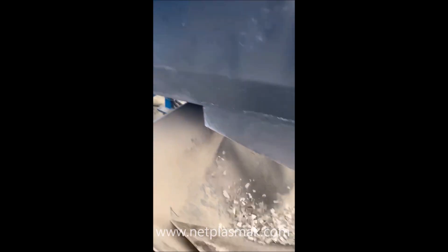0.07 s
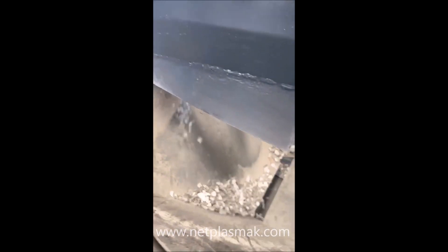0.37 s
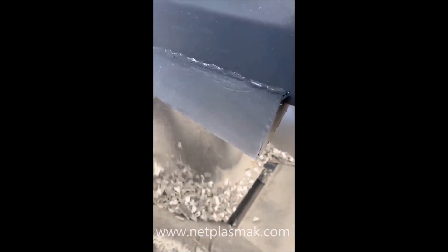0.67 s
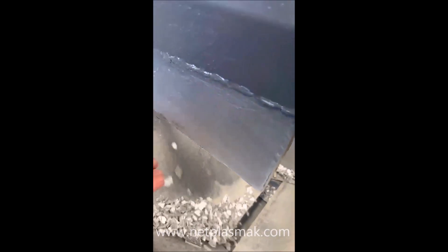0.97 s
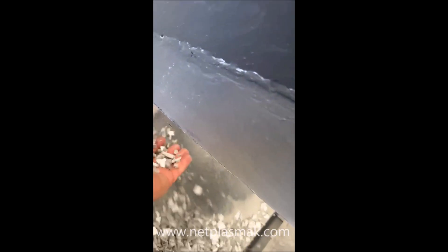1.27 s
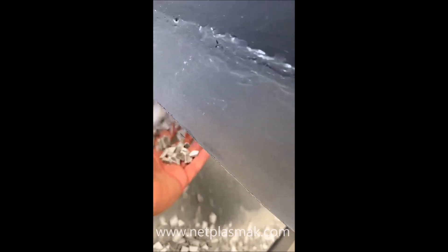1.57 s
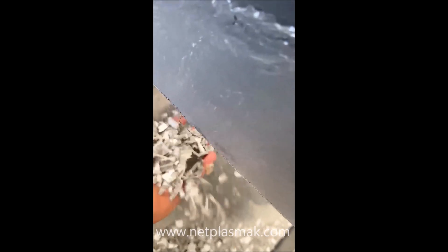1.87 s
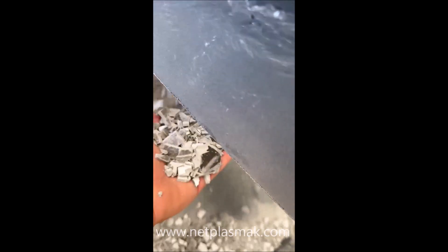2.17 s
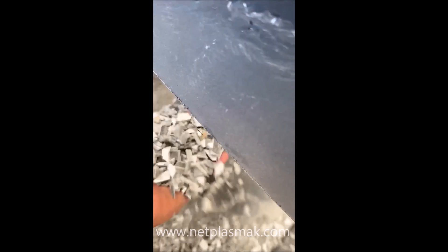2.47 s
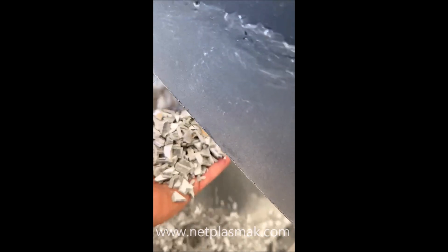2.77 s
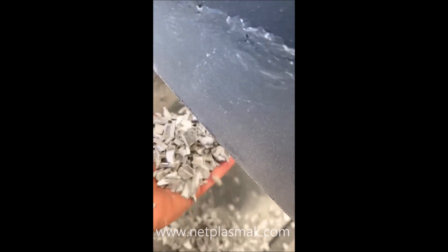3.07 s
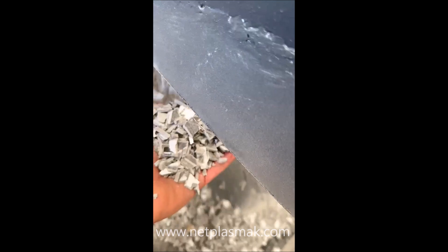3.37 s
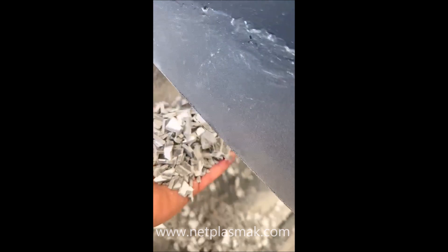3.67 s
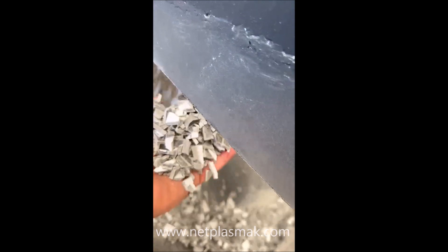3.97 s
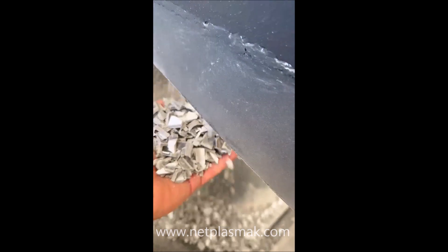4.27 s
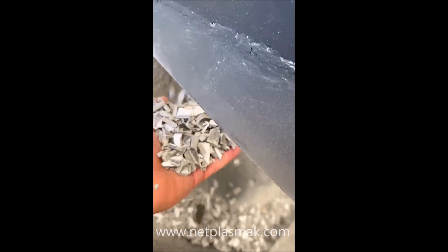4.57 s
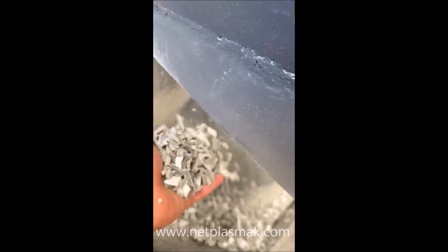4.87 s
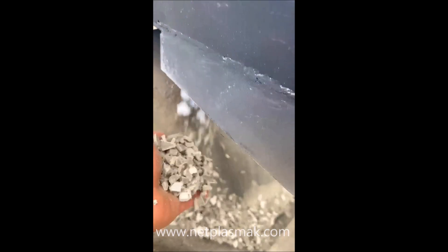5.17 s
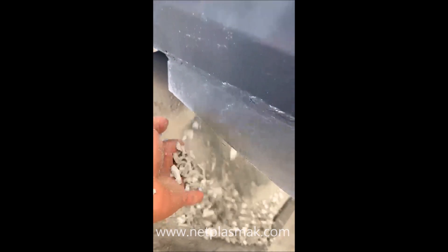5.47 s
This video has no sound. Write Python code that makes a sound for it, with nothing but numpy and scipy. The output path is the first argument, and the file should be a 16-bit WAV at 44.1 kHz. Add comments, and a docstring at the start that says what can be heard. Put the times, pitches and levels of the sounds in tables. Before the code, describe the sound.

A plastic shredder rumbles and grinds, biting into scrap with knocks and thumps while chips hiss and rattle down its chute.

```python
"""A booming rumble under a hiss of chips: a plastic shredder in a workshop, heard beside its chute.
The motor hums, its drive whines, and the rotor tumbles scrap in a steel housing. Chips rattle down
the chute into a hand, and larger lumps knock on the walls and set them ringing. The knives bite
again and again, twice into big pieces, and each fracture excites the resonant modes of the housing."""
import sys
import numpy as np
from scipy import signal
from scipy.fft import rfft, irfft, next_fast_len
from scipy.io import wavfile
from scipy.ndimage import uniform_filter1d, map_coordinates

SR = 44100
rng = np.random.default_rng(int(sys.argv[2]) if len(sys.argv) > 2 else 0)


def materialize(psi):
    """Save the field psi as 16-bit PCM at rate SR to the path in sys.argv[1].

    A 1-D psi becomes a single channel; in a 2-D psi each row is a channel.
    """
    bounded = np.clip(np.atleast_2d(psi).T, -1, 1)
    quanta = np.round(bounded * 32767).astype(np.int16)
    wavfile.write(sys.argv[1], SR, quanta)


N = 251811
TIME = np.arange(N) / SR
FFT_SIZE = next_fast_len(N + SR // 2)
FREQ_HZ = np.fft.rfftfreq(FFT_SIZE, 1 / SR)

# Levels are relative within each source.
# level, phase and likeness of the two channels:
# frequency_hz, left_minus_right_db, left_phase_rad, likeness (0-1)
STEREO_IMAGE = [(55, -1.5, -.2, .88), (100, -8, -.4, .92), (140, -15, -1.4, .75), (240, -14.5, -2.1, .6),
                (300, -10.5, -2.4, .64), (370, -8.5, -3.3, .72), (450, -3.4, -3.3, .83),
                (650, -2.7, -3.4, .83), (870, -.4, -3.2, .94), (1000, -.8, -3.3, .86),
                (1150, -1.5, -3.6, .54), (1400, -1, -3.2, .47), (1700, -1, -3.9, .22),
                (2000, .3, -4.2, .35), (3200, .4, -3.6, .58), (3700, .8, -4.1, .47), (4050, 1.7, -5.2, .2),
                (4400, .1, -3.9, .25), (4700, -.7, -3.2, .75), (4880, -.7, -3.2, .88),
                (5050, -2.2, -4.2, .26), (5250, -1, -6.2, .85), (6500, 0, -6.3, .99), (7200, .2, -6.4, .92),
                (7800, -.6, -7, .73), (8500, -.3, -7.5, .66), (9400, -.4, -6.4, .8)]
# hum of motor and rotor: pitch_hz, level_db
HUM_TONES = [(49.7, -53), (100, -45), (150.7, -44), (177, -51.5), (248, -45), (362, -49.5), (412, -49.5)]
# switching tone of the drive and its sidebands, lowest first: left_db, right_db
WHINE_LINES = [(-60, -50), (-47, -50.5), (-50.5, -51.5), (-50.5, -57), (-56.5, -56.5)]
# tones of the motor shaft: pitch_hz, level_db, left_lag_rad
SHAFT_TONES = [(493, -4, 3.33), (594.6, -1, 2.46), (980, -12, 2.75)]
# rise and fall of the shaft tones: time_s, level_db
SHAFT_LEVEL = [(0, -42.5), (.45, -47.5), (.65, -36.5), (1.5, -36.5), (2.6, -38.5), (3.3, -41), (4.0, -42),
               (4.8, -36), (5.71, -38)]
# fullness of the cutting chamber, as the level of the tumbling scrap: time_s, level_db
CHAMBER_LOAD = [(0, -32.5), (.45, -32.5), (1.1, -31), (1.45, -29), (2.15, -27.5), (2.7, -27), (3.1, -28.5),
                (3.55, -27), (4.25, -27.5), (4.55, -28), (5.71, -28)]
# spectra of frame, scrap, screen, chips and lumps: frequency_hz, density_db
RUMBLE_SPECTRUM = [(20, -70.5), (36, -38), (48, -6), (75, -8), (100, 0.5), (135, 2), (200, -7),
                   (400, -30.5), (1000, -71.5)]
TUMBLE_SPECTRUM = [(70, -26.5), (140, -9), (210, 0), (320, 4), (460, -5), (630, -4.5), (800, -16),
                   (1100, -18.5), (2000, -55.5)]
GRIND_SPECTRUM = [(400, -22), (650, 7.5), (870, 9), (1250, 3.5), (1650, 0.2), (2050, 3), (2450, 0),
                  (2800, -1), (3200, -2.5), (3550, -2), (4100, -14.5), (5000, -24.5), (10000, -42.5)]
CHIP_SPECTRUM = [(1000, -30), (3000, -10.5), (3600, -2), (4100, -3.5), (4700, 0), (5150, -5.5),
                 (6000, -1.5), (7000, -1.5), (7800, 0.5), (8450, -1), (8800, -4), (9300, -12), (9800, -44)]
CLACK_SPECTRUM = [(300, -8), (900, 11.5), (1400, 3.5), (2400, 1), (5000, -10.5), (10000, -29.5)]
# stream of chips, which grows as the hand moves in under the chute: time_s, level_db
CHIP_FLOW = [(0, -38.5), (1.7, -38), (2.0, -36), (3.5, -40.5), (4.0, -38.5), (5.0, -35), (5.71, -36)]
# clumps of fine chips and coarse splinters sliding out: centre_s, fine_db, coarse_db, half_length_s
CLUMPS = [(0.665, -34.5, -34, 0.016), (0.737, -33.5, -37, 0.0065), (0.754, -34.5, -47, 0.0044),
          (1.206, -35.5, -35, 0.04), (1.886, -34.5, -35, 0.014), (2.066, -35.5, -48, 0.015),
          (2.148, -33, -34.5, .01), (2.471, -36, -27, 0.019), (2.648, -37.5, -32.5, 0.028),
          (2.743, -31, -31, 0.016), (3.11, -36, -42.5, 0.2), (3.712, -35, -41.5, 0.18),
          (4.294, -35, -34.5, 0.12), (4.423, -34, -35.5, 0.011), (4.76, -36, -39, 0.062),
          (4.966, -33, -40, 0.02)]
# big chips striking the chute: time_s, level_db
CHUTE_STRIKES = [(0.7215, -15.5), (1.1894, -23), (2.1362, -24), (2.732, -19.5), (3.5146, -20.5),
                 (4.408, -26.5), (5.0393, -18)]
# lumps thrown against the walls: time_s, level_db, pitch_hz, chatter_t60_s, clack_db
WALL_KNOCKS = [(1.561, -32.5, 977, 0.44, -37.5), (1.585, -32.5, 750, 0.69, -34.5),
               (1.872, -23.5, 782, 0.15, -36), (1.897, -25, 707, 0.2, -37), (1.949, -27, 777, 0.61, -32),
               (2.054, -28, 635, 0.19, -45.5), (2.222, -28.5, 772, 0.88, -26.5), (2.3, -31.5, 694, .2, -40),
               (2.329, -25.5, 700, 0.34, -40.5), (2.606, -31.5, 627, 0.11, -38),
               (3.277, -28.5, 917, 0.12, -32), (3.376, -32.5, 803, 0.13, -44.5),
               (3.458, -32, 763, 0.096, -40), (3.93, -33, 780, 0.59, -37), (4.155, -25, 826, 0.16, -27),
               (4.61, -34.5, 640, 0.089, -33), (5.229, -25, 518, 0.13, -33), (5.53, -27.5, 803, 0.24, -28)]
# modes of a wall panel: pitch_ratio, gain_db
PANEL_MODES = [(.8, 0), (1, 2.5)]
# modes of the steel housing: pitch_hz, bandwidth_hz, level_db
HOUSING_MODES = [(154.2, 14, -5.5), (178.6, 12, 3), (236, 53, -2), (281, 11, -1), (317, 11, -5.5),
                 (361.4, 11, 0), (415.5, 9, -3.5), (497, 30, -7.5), (634, 130, -5), (740, 130, -10.5),
                 (954, 55, -23.5), (1236, 25, -21.5)]
# thick pieces snapping under the knives: start_s, level_db, favoured_hz, t60_s
THICK_SNAPS = [(1.549, -11, 178, 0.084), (1.5598, -9, 180, .1), (1.586, -10, 355, .08),
               (1.599, -10, 336, 0.065), (1.667, -16.5, 178, .06), (2.075, -12, 337, .06),
               (2.217, -13, 293, 0.092), (2.266, -12, 285, 0.079), (2.294, -15.5, 178, 0.052),
               (3.977, -13, 179, 0.11), (4.225, -21.5, 178, .06)]
# knives taking hold of a piece: time_s, level_db, t60_s, hardness_db_per_octave, favoured_hz
KNIFE_BITES = [(0.047, -24, 0.1, -18, 174), (.295, -29.5, 0.11, -9, 242), (1.557, -13.5, 0.81, 1.2, 170),
               (1.664, -21, 0.32, 5.5, 418), (1.775, -21, 0.4, -6, 178), (1.871, -20, 0.16, 1, 175),
               (2.222, -12.5, 0.8, 3, 293), (2.336, -21.5, 0.59, 4.5, 414), (2.496, -21, 0.32, 3.5, 416),
               (2.62, -26.5, 0.087, 5, 616), (2.853, -20, 0.24, 4, 630), (3.978, -21.5, 0.21, 0, 176),
               (4.155, -19.5, 0.15, -1.5, 324), (4.227, -22.5, 0.39, -1.5, 170), (5.544, -23, 0.18, 9, 640)]


def amp(db):
    """Decibels as an amplitude ratio."""
    return 10 ** (np.asarray(db) / 20)


def unit(x):
    """Normalisation to rms 1."""
    return x / np.sqrt(np.mean(x ** 2) + 1e-20)


def over_frequency(table):
    """Interpolation of a table's columns on a log-frequency axis."""
    hz, *columns = np.transpose(table)
    return [np.interp(np.log(FREQ_HZ + 1), np.log(hz + 1), column) for column in columns]


def over_time(table):
    """Linear interpolation of a level, one value a sample."""
    return np.interp(TIME, *np.transpose(table))


def wobble(per_s):
    """Smooth random modulation through per_s values a second."""
    return map_coordinates(rng.standard_normal(int(N * per_s / SR) + 4), [TIME * per_s])


def filtered(x, response):
    """Linear filtering: the spectrum of x times a response over FREQ_HZ."""
    return irfft(rfft(x, FFT_SIZE) * response, FFT_SIZE)[..., :N]


def coloured(x, spectrum):
    """Spectral shaping by a table, at rms 1."""
    return unit(filtered(x, amp(over_frequency(spectrum)[0])))


def impacts(per_s, spread_db):
    """Shot noise: two independent streams of random impulses, at rms 1."""
    hit = rng.random((2, N)) < per_s / SR
    size = amp(spread_db * np.clip(rng.standard_normal((2, N)), -2, 2))
    return unit(hit * size * rng.choice([-1, 1], (2, N)))


def burst(peak_s, rise_s, t60_s):
    """A transient's envelope: Gaussian rise to 1, then exponential decay."""
    age = TIME - peak_s
    return np.exp(-(np.minimum(age, 0) / rise_s) ** 2) * amp(-60 * np.maximum(age, 0) / t60_s)


def ring(start_s, hz, t60_s):
    """Free vibration of one mode: a damped sine."""
    wave, start = np.zeros(N), round(start_s * SR)
    age = TIME[:min(SR // 2, N - start)]
    wave[start:start + len(age)] = np.sin(2 * np.pi * hz * age) * amp(-60 * age / t60_s)
    return wave


def tone(hz, scatter, per_s):
    """Narrow-band modulation: a complex tone whose amplitude and phase wander."""
    wander = (1 + scatter * (wobble(per_s) + 1j * wobble(per_s))) / np.sqrt(1 + 2 * scatter ** 2)
    return np.sqrt(2) * wander * np.exp(2j * np.pi * hz * TIME)


def stereo(pair, direct=0):
    """Partial coherence: a common and a diffuse signal mix; direct makes the channels more alike."""
    tilt_db, phase, likeness = over_frequency(STEREO_IMAGE)
    angle = np.arccos(np.clip(1 - (1 - likeness) * (1 - direct), 0, 1)) / 2
    common, diffuse = rfft(pair, FFT_SIZE) * [np.cos(angle), np.sin(angle)]
    left = (common + diffuse) * amp(tilt_db) * np.exp(1j * phase)
    equal_power = np.sqrt(2 / (1 + amp(tilt_db) ** 2))
    return irfft(np.array([left, common - diffuse]) * equal_power, FFT_SIZE)[:, :N]


def motor():
    """Periodic forces give hum, shaft tones and drive whine; echoes make the two sides differ."""
    whine_hz, mains_hz = 1850, 50
    hum = sum(amp(db) * tone(hz, scatter=.25, per_s=4.85).real for hz, db in HUM_TONES)
    whine, shaft = np.zeros((2, 2, N))
    for k, levels_db in enumerate(WHINE_LINES):
        hz = whine_hz + 2 * mains_hz * k
        for side, phasor in enumerate((-1j, 1)):  # a quarter cycle late on the left
            whine[side] += amp(levels_db[side]) * np.real(phasor * tone(hz, scatter=.33, per_s=3.5))
    for hz, db, lag_rad in SHAFT_TONES:
        for side, phasor in enumerate((np.exp(-1j * lag_rad), 1)):
            shaft[side] += amp(db) * np.real(phasor * tone(hz, scatter=.42, per_s=17))
    return stereo([hum, np.zeros(N)], direct=.64) + whine + amp(over_time(SHAFT_LEVEL)) * shaft


def clumps():
    """Gaussian envelopes, fine and coarse: each sliding clump swells and thins out evenly."""
    return sum(amp([[fine_db], [coarse_db]]) * np.exp(-((TIME - centre_s) / half_s) ** 2 / 2)
               for centre_s, fine_db, coarse_db, half_s in CLUMPS)


def patchy(x, depth_db):
    """Size sets pitch: like pieces fall together, so their spectrum fluctuates in patches."""
    spectrogram = signal.stft(x, nperseg=512)[2]
    patches = uniform_filter1d(rng.standard_normal(spectrogram.shape[1:]), size=3, axis=0)
    patches = unit(uniform_filter1d(patches, size=6, axis=1))
    return signal.istft(spectrogram * amp(depth_db * patches), nperseg=512)[1][:, :N]


def chute(x, ripple_db, mode_gap_hz=22):
    """High modal density: the chute's walls ripple the spectrum of what rattles on them; rms 1."""
    modes = rng.standard_normal(int(SR / mode_gap_hz))
    return unit(filtered(x, amp(ripple_db * map_coordinates(modes, [FREQ_HZ / mode_gap_hz]))))


def flakes(per_s, low_hz, high_hz, t60_cycles, spread_db=18):
    """Damped vibration of single pieces, each clicking at its own pitch; rms 1."""
    when, size, pitch = rng.random((int(per_s * N / SR), 3)).T
    hz = low_hz * (high_hz / low_hz) ** pitch
    step = np.arange(SR // 40)
    cycles = hz[:, None] * step / SR
    clicks = amp(spread_db * size)[:, None] * np.sin(2 * np.pi * cycles) * amp(-60 * cycles / t60_cycles)
    samples = (when * N).astype(int)[:, None] + step
    return unit(np.bincount(samples.ravel(), clicks.ravel(), N)[:N])


def rotor():
    """Forced vibration: the frame's rumble, the tumbling and the grinding all follow the load."""
    load_db = over_time(CHAMBER_LOAD)
    excess_db = load_db - load_db.mean()
    rumble = amp(-34 + .69 * excess_db) * coloured(rng.standard_normal((2, N)), RUMBLE_SPECTRUM)
    tumble_level = amp(load_db + 1.1 * wobble(14))
    tumbling = tumble_level * coloured(impacts(per_s=4000, spread_db=1), TUMBLE_SPECTRUM)
    # splinters from bites and clumps add their power to the grinding on the screen
    _, coarse = clumps()
    surges = np.hypot(amp(-35) * bite_forces().sum(0), coarse)
    grind_level = np.hypot(amp(-32.5 + .45 * excess_db + .4 * wobble(30)), surges)
    scrape = coloured(patchy(impacts(per_s=14000, spread_db=1.5), depth_db=1.9), GRIND_SPECTRUM)
    pings = np.array([flakes(per_s=220, low_hz=1299, high_hz=3760, t60_cycles=60) for _ in range(2)])
    grinding = grind_level * chute(scrape + .33 * pings, ripple_db=1.7)
    return stereo(rumble + tumbling + grinding)


def chips():
    """Superposition: ticks on the chute and on other chips merge to a hiss; the nearest click singly."""
    flow = amp(over_time(CHIP_FLOW) + .2 * wobble(9) + .64 * wobble(32))
    fine, _ = clumps()
    level = np.hypot(flow, fine)
    ticks = impacts(per_s=3500, spread_db=2.5) + 1.43 * rng.standard_normal((2, N))
    stream = chute(coloured(patchy(ticks, depth_db=2), CHIP_SPECTRUM), ripple_db=1.2)
    stream[0] += amp(-7.5) * flakes(per_s=380, low_hz=3193, high_hz=8640, t60_cycles=130)
    return stereo(level * stream)


def strikes():
    """Brief contact gives a bright sound: a big chip ticks on the chute and skitters on."""
    force = sum(amp(db - 12) * burst(time_s, rise_s=.0004, t60_s=.053) for time_s, db in CHUTE_STRIKES)
    return stereo(force * coloured(impacts(per_s=3500, spread_db=4), CHIP_SPECTRUM), direct=.39)


def knocks():
    """Impact excitation: a lump clacks on a wall panel, rings its modes and chatters against it."""
    rise_s, left_delay_s = .006, .00011
    walls = np.zeros((2, N))
    chatter = impacts(per_s=1500, spread_db=1.5)
    clack = coloured(impacts(per_s=1700, spread_db=.5), CLACK_SPECTRUM)
    for time_s, db, hz, chatter_t60_s, clack_db in WALL_KNOCKS:
        panel = signal.butter(2, [hz / 1.12, hz * 1.008], "bandpass", fs=SR, output="sos")
        walls += amp(db) * burst(time_s, rise_s, chatter_t60_s) * unit(signal.sosfilt(panel, chatter))
        walls += amp(clack_db) * burst(time_s, rise_s, t60_s=.23) * clack
        for ratio, gain_db in PANEL_MODES:  # the clean ring joins the common signal only
            walls[0] += amp(db + gain_db) * ring(time_s, hz * ratio, t60_s=.13)
    left, right = stereo(walls, direct=.11)
    delay = np.exp(-2j * np.pi * FREQ_HZ * left_delay_s)  # the wall stands off to one side
    return np.array([filtered(left, delay), right])


def nearness(hz, favoured_hz, width_octaves=.17):
    """Selective excitation: the place of a cut favours the modes near one pitch; weight 0-1."""
    return np.exp(-(np.log2(hz / favoured_hz) / width_octaves) ** 2)


def housing(x):
    """Resonance: each housing mode's response to x at rms 1, neighbours in opposite phase."""
    low_cut = 1 / np.sqrt(1 + (120 / (FREQ_HZ + 1)) ** 8)
    modes = []
    for k, (hz, bandwidth_hz, _) in enumerate(HOUSING_MODES):
        damping = 1j * FREQ_HZ * bandwidth_hz
        resonance = damping / (hz ** 2 - FREQ_HZ ** 2 + damping)
        modes.append((-1) ** k * unit(filtered(x, low_cut * resonance)))
    return np.array(modes)


def snaps(favour_db=17):
    """Impulse response: a thick piece gives way and thumps the housing, which the scrap inside damps."""
    thumps = np.zeros(N)
    for start_s, db, favoured_hz, t60_s in THICK_SNAPS:
        thump = sum(amp(mode_db + favour_db * nearness(hz, favoured_hz)) * ring(start_s, hz, t60_s)
                    for hz, _, mode_db in HOUSING_MODES)
        thumps += amp(db) * thump / np.abs(thump).max()
    low_cut = signal.butter(4, 120, "highpass", fs=SR, output="sos")
    return stereo([signal.sosfilt(low_cut, thumps), np.zeros(N)], direct=.9)


def bite_forces():
    """One envelope a bite: the break and the softer, longer chewing of its remains add in power."""
    forces = []
    for time_s, db, t60_s, *_ in KNIFE_BITES:
        rise_s = .027 * t60_s  # bigger pieces take longer to grip
        chewing = amp(-4.5) * burst(time_s, rise_s, 3 * t60_s)
        forces.append(amp(db) * np.hypot(burst(time_s, rise_s, t60_s), chewing))
    return np.array(forces)


def bites(favour_db=3.5):
    """Modal excitation: a run of fractures rings the housing; hard pieces favour its upper modes."""
    *_, hardness, favoured_hz = np.transpose(KNIFE_BITES)
    mode_hz, _, mode_db = np.transpose(HOUSING_MODES)
    tilt_db = np.log2(mode_hz / mode_hz[0])[:, None] * hardness
    place_db = favour_db * nearness(mode_hz[:, None], favoured_hz)
    power = amp(mode_db[:, None] + tilt_db + place_db) ** 2  # modes by bites
    envelopes = np.sqrt(power / power.sum(0) @ bite_forces() ** 2)
    modes = housing(impacts(per_s=980, spread_db=3.5))
    # the knives keep pressing, so each mode holds its strength from moment to moment
    running_power = np.abs(uniform_filter1d(modes ** 2, size=SR // 20))
    modes /= np.sqrt(running_power + 1e-3)
    return stereo((envelopes[:, None] * modes).sum(0), direct=.11)


def scene():
    """Superposition of the machine, the chips and the cutting."""
    return motor() + rotor() + chips() + strikes() + knocks() + snaps() + bites()


def record(dry):
    """Soft saturation rounds the highest peaks, and a band limit removes the top treble."""
    ceiling, top_hz = .9, 9800
    rounded = dry / (1 + np.abs(dry / ceiling) ** 6) ** (1 / 6)
    return filtered(rounded, FREQ_HZ < top_hz)


dry = scene()
out = record(dry)
materialize(out)
```